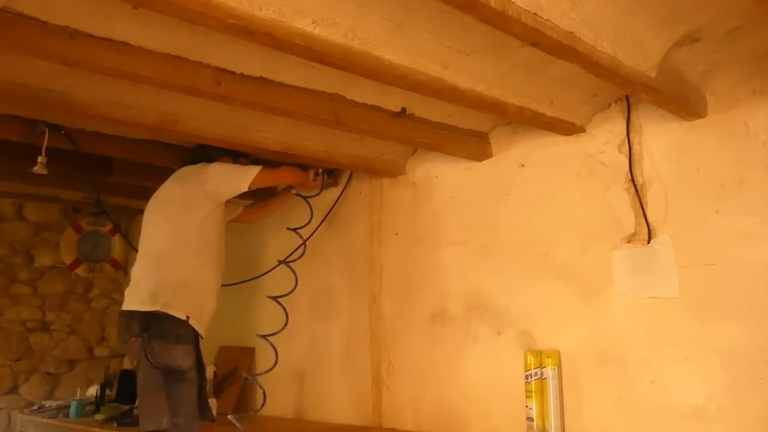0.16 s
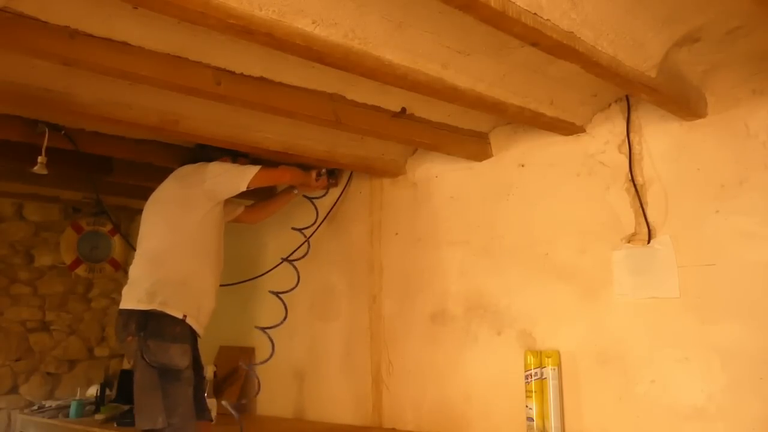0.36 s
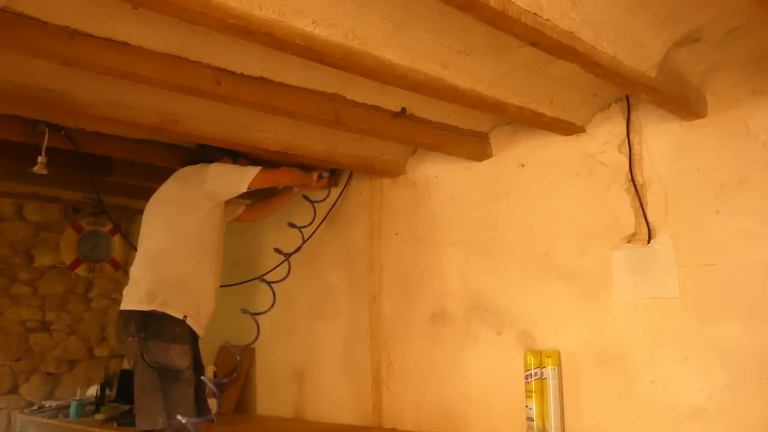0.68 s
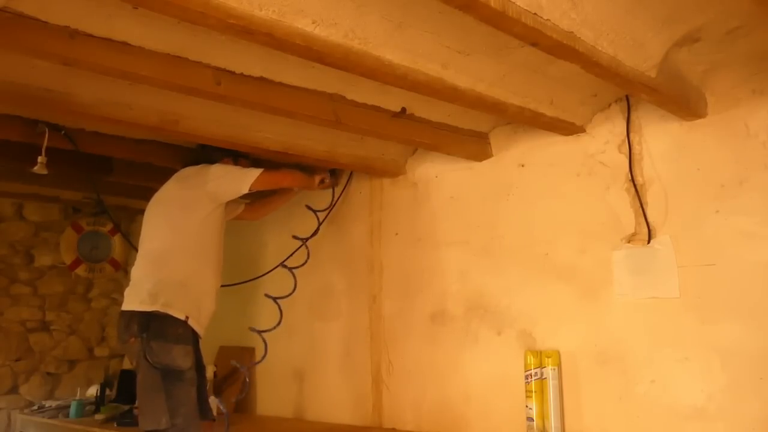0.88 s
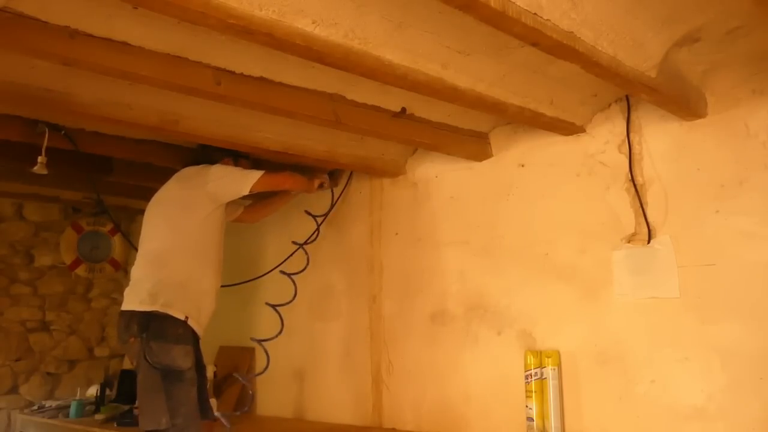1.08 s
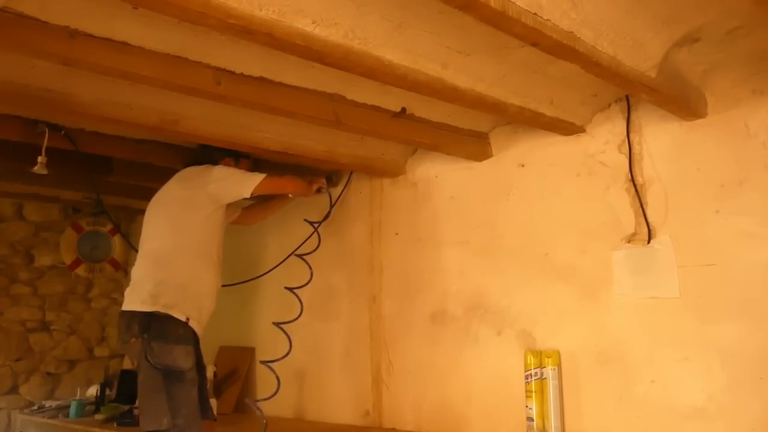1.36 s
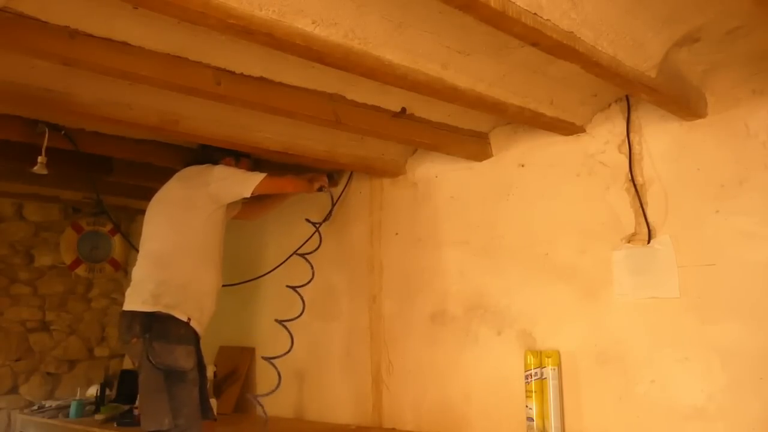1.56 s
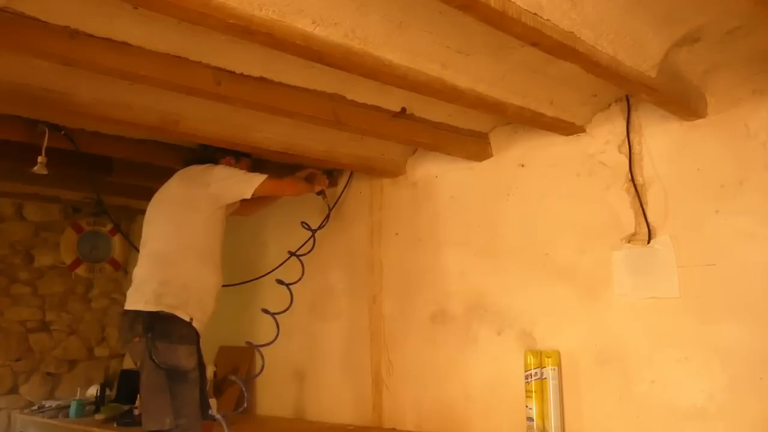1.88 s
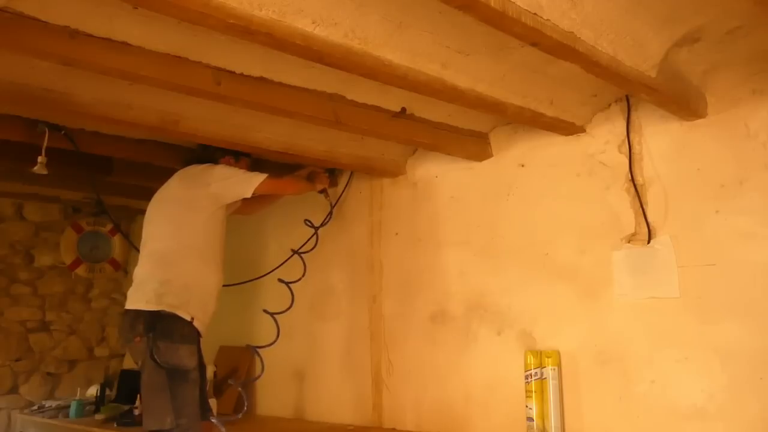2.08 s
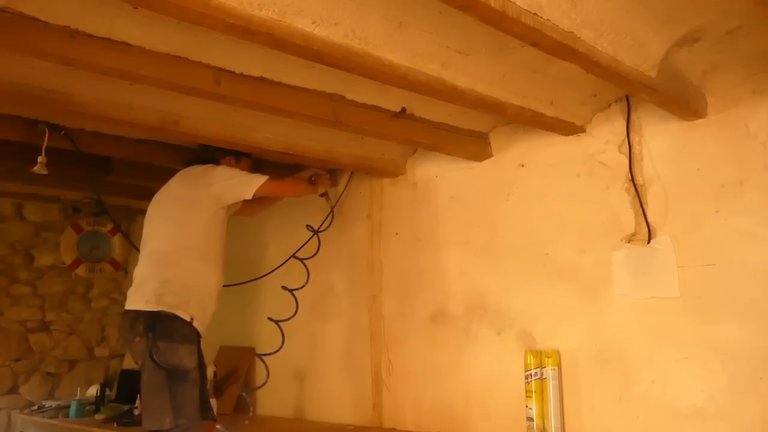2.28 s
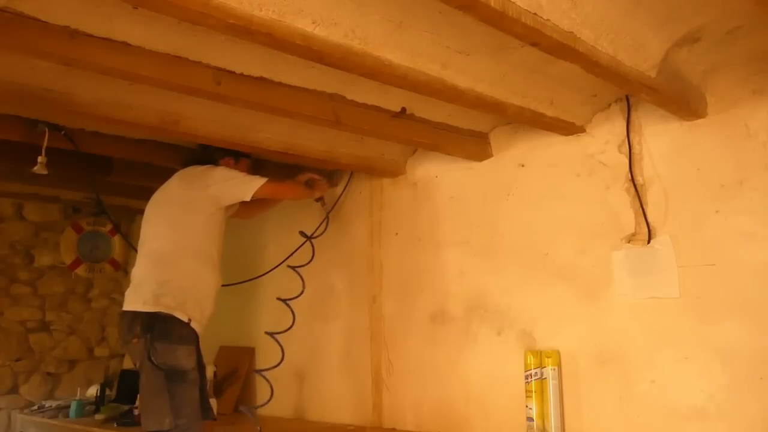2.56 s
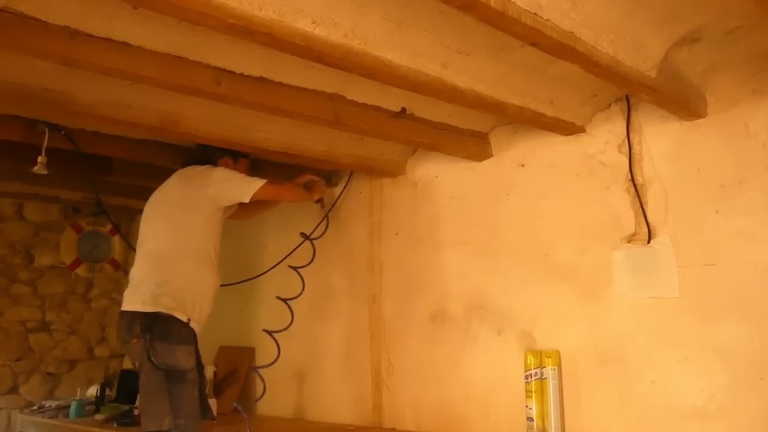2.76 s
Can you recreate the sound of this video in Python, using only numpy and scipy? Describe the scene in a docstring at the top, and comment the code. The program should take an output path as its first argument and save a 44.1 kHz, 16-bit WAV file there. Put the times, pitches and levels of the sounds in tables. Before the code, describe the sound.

An air hammer chisels a stone wall in a rapid, harsh burst, stops while chips knock and grit patters down, then fires a shorter burst and a few last chips fall; bare reverberant room, loud slightly overloaded microphone.

```python
"""Air hammer on a plastered stone wall

An air hammer chisels the wall in two short bursts, in a bare room with a beamed ceiling.
Each stroke excites resonators: an exhaust pop, a thud of wall and beams, the ringing steel chisel.
Noise shaped by the strokes gives the crunch of stone and the hiss of air past the valve.
Mostly between bursts, chips drop: each a damped knock with scattered noise, amid random ticks of grit.
Echo, faint room noise and a hum surround this; gain control and overload shape the sum."""
import sys
import numpy as np
from scipy import signal
from scipy.fft import rfft, irfft
from scipy.io import wavfile
from scipy.ndimage import uniform_filter1d

SR = 44100
rng = np.random.default_rng(int(sys.argv[2]) if len(sys.argv) > 2 else 0)


def generate_wav(signal):
    """Clip the signal to [-1, 1] and save it as 16-bit WAV at the path in sys.argv[1]."""
    frames = np.transpose(np.atleast_2d(signal))
    scaled = np.clip(frames, -1, 1) * 32767
    pcm = np.round(scaled).astype(np.int16)
    wavfile.write(sys.argv[1], SR, pcm)


N = 130095

# Hammer bursts, one list each: [t/s, stroke rate/Hz, pop level/dB, blow level/dB, hiss level/dB]
BURSTS = [
    [(.2285, 43.7, -4, -10.5, -17), (.26, 43.6, -13.5, -18, -20.5), (.4, 42.0, -13, -18, -24.5),
     (.5, 40.9, -14.5, -18, -24), (.78, 41.3, -14, -15.5, -24), (.86, 42.3, -12.5, -21.5, -22.5),
     (.94, 41.0, -15.5, -13.5, -23.5), (.98, 33.3, -13, -21, -28.5), (1.012, 37, -23.5, -47, -40)],
    [(1.982, 42.0, -10, -13, -23), (2.02, 43.8, -12.5, -14.5, -20.5), (2.1, 43.3, -11.5, -20.5, -24.5),
     (2.22, 43.0, -15.5, -16.5, -26), (2.34, 42.0, -12, -20.5, -23), (2.445, 40.1, -17.5, -16, -25.5),
     (2.46, 29, -10, -15, -28), (2.49, 32.0, -25, -16.5, -54), (2.535, 36.7, -17.5, -58, -48)],
]
# Piston stirring as the valve opens: [t/s, pop level/dB]
VALVE_OPENING = [(0.208, -51), (1.957, -36.5)]
# Resonances of wall and beams: [f/Hz, level/dB, T60/s]
WALL_MODES = [(166.5, -44, 0.039), (219.7, -19, .12), (262.4, -19, 0.051), (294.6, -7.5, 0.12),
              (330.5, -7.5, 0.084), (387, -14, 0.12), (473, -15.5, 0.16), (590, -23, 0.033)]
# Frequencies of the chisel's steel modes: [f/Hz]
CHISEL_HZ = [1310, 2130, 4800, 9300, 8450, 9200, 9290, 12900, 14800, 15490]
# Strength and decay of those modes, in the same order: [level/dB, T60/s]
CHISEL_DECAYS = [(-18, 0.061), (-17, 0.036), (-18, 0.048), (0, 0.0055), (-8, 0.033), (-17, 0.025),
                 (-7, 0.054), (-16, 0.046), (-22, 0.064), (-19, 0.061)]
# Spectrum of the escaping air, also used for the crunch: [f/Hz, relative level/dB]
AIR_SPECTRUM = [(290, -38), (500, 3), (530, -6), (773, -4.5), (1050, -15.5), (1320, -7.5), (2360, -12),
                (5310, -14.5), (9220, -10), (14000, -17.5), (16000, -9.5)]
# Chips landing: [t/s, level/dB, ring f/Hz, treble level/dB, scatter decay/s, scatter level/dB,
# echo send level/dB]; treble and scatter are relative to the chip, the send to its direct sound
CHIPS = [(0.1716, -42, 2220, -22, .01, -10, 0), (1.1352, -17.5, 2820, -13, 0.0084, -11, 1),
         (1.1646, -14.5, 2530, -29, .012, -4.5, -2.5), (1.27, -30.5, 2100, -10, .012, -10, -4),
         (1.3289, -30, 3200, -17, 0.0085, -12, -1.5), (1.3648, 4, 2130, -51, 0.0098, -14.5, -2.5),
         (1.472, -14.5, 2090, -15, 0.012, -4, -3), (1.548, -12.5, 2770, -20.5, 0.012, -8, -2),
         (1.6572, -23.5, 1690, -34, 0.0075, -6.5, -1.5), (1.714, -32, 2080, -25, 0.0072, -8.5, 0.5),
         (1.747, -32.5, 2120, -21, 0.0088, -9, -1), (1.803, -35, 2220, -21.5, 0.011, -7.5, -1.5),
         (1.852, -35.5, 1320, -27.5, 0.0068, -16, -1), (1.8665, -37.5, 1040, -22, 0.0072, -4, -13),
         (1.9048, -38, 1250, -12.5, 0.0092, -2.5, -6), (2.6271, -12.5, 2430, -26, .015, -5.5, -1.5),
         (2.8167, -29, 1620, -25, 0.018, -8, 1.5), (2.8386, -29, 1780, -24, 0.0081, -9.5, -3),
         (2.918, -29, 1950, -26, 0.014, -3, -5)]
# Modes of a chip: [multiple of its ring frequency/1, level/dB]
CHIP_MODES = [(.4, -11), (.65, -4.5), (1, -2), (1.3, -1.5), (1.65, -5)]
# Spectrum of stone scatter: [f/Hz, relative level/dB]
STONE_SPECTRUM = [(150, -61), (250, -17.5), (696, -5), (850, -11), (933, -7.5), (1670, -6.5), (1990, 4),
                  (2370, -7.5), (3430, -14), (6000, -5.5), (7800, -47), (13200, -120)]
# Fine grit: [t/s, level/dB]
GRIT_LEVELS = [(1.0, -70), (1.15, -56.5), (1.5, -53), (1.7, -69.5), (1.95, -57), (2.55, -60), (2.7, -47),
               (2.95, -61)]
# Reverberation of the room: [f/Hz, T60/s]
ROOM_T60 = [(100, 0.36), (300, 0.67), (1000, 0.36), (3000, 0.31), (8000, .3), (16000, 0.12)]
# Spectrum of the room noise: [f/Hz, relative level/dB]
FLOOR_SPECTRUM = [(18, -32), (30, 13), (112, -22.5), (170, -22), (499, -20), (540, -23), (889, -26.5),
                  (11700, -43.5), (14800, -39), (16000, -72)]

VALVE_LEAD_S, VALVE_RISE_DB = .024, 37.5  # air rushes in before the first stroke
JITTER_S, STROKE_SPREAD_DB = .0005, 2.5  # standard deviations; pops take half the level spread
POP_HZ, POP_T60_S = 285, .021
BLOW_LAG_S = .002  # blow after pop
MODE_SPREAD_DB = 3.0  # standard deviation of each steel mode, from blow to blow
CRUNCH_DB, CRUNCH_DECAY_S = 4.5, .0017  # stone breaking under the tip
HISS_GATE = .78  # depth to which the hiss puffs with each stroke

CHIP_RING_DB, CHIP_RING_T60_S, CHIP_TOP_HZ = .5, .0075, 4640
RATTLES_PER_S, RATTLE_DECAY_S = 600, .0015  # small contacts within the scatter
GRIT_PER_S, SNAP_DB = 430, -9  # snap: treble noise in the grit

ROOM_DB, ROOM_GAP_S, POP_ROOM_DB = 1, .003, -7.5
TURN_HZ = 3.0  # rate at which the sound turns between two echoes, evening out their colour
WIDTH_DB = -32.5
FLOOR_DB, HUM_HZ, HUM_DB = -48, 542.5, -64

BASS_CUT_HZ, CUTOFF_HZ, FULL_SCALE = 109, 16350, .85
GAIN_KNEE_DB, GAIN_SHARE = -20, .23  # dB of reduction per dB above the knee
GAIN_ATTACK_S, GAIN_RELEASE_DB_PER_S = .018, 81  # release of the held level


def amp(db):
    """Decibel law: a level becomes an amplitude ratio."""
    return 10 ** (np.asarray(db) / 20)


def rms_one(x):
    """Normalisation of power: the effective value becomes one."""
    return x / np.sqrt(np.mean(x ** 2) + 1e-20)


def at_hz(points, hz):
    """Logarithmic pitch scale: table values are interpolated over log frequency."""
    table = np.array(points)
    return np.interp(np.log(np.maximum(hz, 1)), np.log(table[:, 0]), table[:, 1])


def colour(x, spectrum):
    """Linear filtering: a spectrum weights the sound, falling away below its lowest point."""
    hz = np.arange(len(x) // 2 + 1) * SR / len(x)
    low_edge = 1 / (1 + (spectrum[0][0] / np.maximum(hz, 1)) ** 4)
    return irfft(rfft(x) * amp(at_hz(spectrum, hz)) * low_edge, len(x))


def ring(clicks, hz, t60):
    """Damped resonance: each unit click starts a decaying sine of initial height one."""
    radius, angle = amp(-60 / (t60 * SR)), 2 * np.pi * hz / SR
    feedback = [1, -2 * radius * np.cos(angle), radius * radius]
    return signal.lfilter([0, np.sin(angle)], feedback, clicks + 1e-18)


def fade(clicks, seconds):
    """Exponential relaxation: each click becomes an envelope with this time constant."""
    return signal.lfilter([1], [1, -np.exp(-1 / (seconds * SR))], clicks + 1e-18)


def strokes():
    """Phase accumulation: the integral of the running rate times the pops, blows and hiss puffs."""
    t = np.arange(N) / SR
    pops, blows, hiss_level = np.zeros((3, N))
    for rows in BURSTS:
        s, rate, pop_db, blow_db, hiss_db = np.transpose(rows)
        on = (t >= s[0]) & (t <= s[-1])
        turns = np.cumsum(np.interp(t, s, rate) * on) / SR
        count = int(turns[-1]) + 1
        luck = rng.standard_normal((count, 3))
        luck[0] = 0  # the first stroke is exact
        when = np.interp(np.arange(count), turns[on], t[on]) + JITTER_S * luck[:, 0]
        at = (when * SR).astype(int)
        pops[at] = amp(np.interp(when, s, pop_db) + .5 * STROKE_SPREAD_DB * luck[:, 1])
        blow_at = at + int(BLOW_LAG_S * SR)
        blows[blow_at] = amp(np.interp(when, s, blow_db) + STROKE_SPREAD_DB * luck[:, 2])
        rise_db = -VALVE_RISE_DB * np.clip((s[0] - t) / VALVE_LEAD_S, 0, 1)
        puffs = 1 + HISS_GATE * np.cos(2 * np.pi * (turns - .1))
        flowing = (t > s[0] - VALVE_LEAD_S) & (t <= s[-1])
        hiss_level += amp(np.interp(t, s, hiss_db) + rise_db) * puffs * flowing
    for s, db in VALVE_OPENING:
        pops[int(s * SR)] = amp(db)
    return pops, blows, hiss_level


def exhaust_and_wall(pops):
    """Forced resonance: a short pressure pulse excites the exhaust pop and the modes of wall and beams."""
    pulses = signal.lfilter(-np.hanning(60) / 30, 1, pops)
    sound = amp(3.0) * ring(pulses, POP_HZ, POP_T60_S)
    for hz, db, t60 in WALL_MODES:
        # each mode's excitation varies in steps of 512 samples
        variation_db = 1.8 * np.repeat(rng.standard_normal(N // 512 + 1), 512)[:N]
        sound = sound + amp(db) * ring(pulses * amp(variation_db), hz, t60)
    return sound


def chisel(blows):
    """Modal superposition: each blow sets the steel modes ringing with random strength and sign."""
    steel = np.zeros(N)
    for hz, (db, t60) in zip(CHISEL_HZ, CHISEL_DECAYS):
        strength = amp(MODE_SPREAD_DB * rng.standard_normal(N)) * rng.choice([-1, 1], N)
        steel += amp(db) * ring(blows * strength, hz, t60)
    return steel


def crunch(blows):
    """Fracture noise: each blow releases a short, exponentially dying noise burst."""
    noise = rms_one(colour(rng.standard_normal(N), AIR_SPECTRUM))
    return amp(CRUNCH_DB) * fade(blows, CRUNCH_DECAY_S) * noise


def air_hiss(hiss_level):
    """Turbulence noise: coloured noise is amplitude-modulated by the puffing flow."""
    return hiss_level * rms_one(colour(rng.standard_normal(N), AIR_SPECTRUM))


def hammer():
    """Common excitation: one stroke sequence drives the pop and thud, and the steel, crunch and hiss."""
    pops, blows, hiss_level = strokes()
    return exhaust_and_wall(pops), chisel(blows) + crunch(blows) + air_hiss(hiss_level)


def band_noise(low_hz, high_hz, noise):
    """Band limitation: a second-order Butterworth design passes one range of frequencies."""
    sos = signal.butter(2, [low_hz, high_hz], "band", fs=SR, output="sos")
    return signal.sosfilt(sos, noise)


def grit(body, bright):
    """Poisson process: random ticks of uneven height gate the noise of stone and its treble snap."""
    s, db = np.transpose(GRIT_LEVELS)
    ticks = (rng.random(N) < GRIT_PER_S / SR) * amp(2.78 * rng.exponential(1, N))
    noise = rms_one(fade(ticks, .0023) * (body + amp(SNAP_DB) * bright))
    return amp(np.interp(np.arange(N) / SR, s, db, left=-120)) * noise


def chips():
    """Impact and scatter: a knock rings damped modes, and small contacts roughen a dying noise."""
    body = rms_one(colour(rng.standard_normal(N), STONE_SPECTRUM))
    bright = rms_one(band_noise(4500, 10500, rng.standard_normal(N)))
    contacts = (rng.random(N) < RATTLES_PER_S / SR) * rng.exponential(1, N)
    rattle = rms_one(.84 + fade(contacts, RATTLE_DECAY_S))
    rough = rattle * body
    low, high = np.zeros((2, 2, N + SR))  # rows of each: heard directly, sent round the room
    span = np.arange(4000)
    for s, db, hz, treble_db, scatter_s, scatter_db, echo_db in CHIPS:
        at = int(s * SR) + span
        decay = amp(db) * np.exp(-span / (scatter_s * SR))
        knock = amp(db + CHIP_RING_DB) * (span == 0)
        rings = np.zeros(len(span))
        for k, (ratio, mode_db) in enumerate(CHIP_MODES):
            rings += (-1) ** k * amp(mode_db) * ring(knock, ratio * hz, CHIP_RING_T60_S)
        onset = 1 - np.exp(-span / 40)
        scatter = amp(scatter_db) * decay * onset * rough[at % N]
        direct_and_sent = amp([[0], [echo_db]])
        low[:, at] += direct_and_sent * (scatter + rings)
        high[:, at] += direct_and_sent * amp(treble_db) * decay * bright[at % N]
    dull = signal.butter(10, CHIP_TOP_HZ, fs=SR, output="sos")
    return signal.sosfilt(dull, low[:, :N]) + high[:, :N] + grit(body, bright)


def room(x):
    """Diffuse reverberation: half-octave noise bands decay at their own rates in two unrelated tails."""
    t = np.arange(SR // 2) / SR
    edges = 60 * 2 ** np.arange(0, 8.6, .5)
    white = rng.standard_normal((2, 2, len(t)))
    tail = np.zeros((2, len(t)))
    for k, (low, high) in enumerate(zip(edges, edges[1:])):
        t60 = at_hz(ROOM_T60, np.sqrt(low * high))
        tail += band_noise(low, high, white[k % 2]) * amp(-60 * t / t60)
    tail *= np.clip(t / ROOM_GAP_S - .5, 0, 1)  # silence, then a ramp
    tail /= np.sqrt(np.sum(tail ** 2, axis=1, keepdims=True))
    return signal.fftconvolve(x[None], tail, axes=1)[:, :N]


def background():
    """Stationary noise: a faint coloured floor and a distant hum, a resonator driven by noise."""
    floor = amp(FLOOR_DB) * rms_one(colour(rng.standard_normal(N), FLOOR_SPECTRUM))
    hum = amp(HUM_DB) * rms_one(ring(rng.standard_normal(N), HUM_HZ, .37))
    return floor + hum


def scene():
    """Superposition: all sounds add; a faint noise, opposite in the two channels, widens the nearly mono sound."""
    pop, rest = hammer()
    fallen, fallen_sent = chips()
    sent = rest + fallen_sent
    turn = 2 * np.pi * TURN_HZ * np.arange(N) / SR
    # the sound turns between two unrelated echoes; the pop feeds only the first
    first_tails = room(sent * np.cos(turn) + amp(POP_ROOM_DB) * pop)
    second_tails = room(sent * np.sin(turn))
    echo, widening = amp(ROOM_DB) * (first_tails + second_tails)
    centre = pop + rest + fallen + echo + background()
    return centre + amp(WIDTH_DB) * widening * np.array([[1], [-1]])


def record(dry):
    """Dynamic compression: after a bass cut, gain falls late on loud sound; then clipping and top cut."""
    bass_cut = signal.butter(2, BASS_CUT_HZ, "high", fs=SR, output="sos")
    x = signal.sosfilt(bass_cut, dry)
    power = uniform_filter1d(np.mean(x ** 2, axis=0), size=128)
    level_db = 10 * np.log10(power + 1e-12)
    # peaks of the level are held, sinking at the release rate
    ramp = GAIN_RELEASE_DB_PER_S * np.arange(N) / SR
    held_db = np.maximum.accumulate(level_db + ramp) - ramp
    over_db = np.maximum(held_db - GAIN_KNEE_DB, 0)
    keep = np.exp(-1 / (GAIN_ATTACK_S * SR))
    late_over_db = signal.lfilter([1 - keep], [1, -keep], over_db)
    x = x * amp(-GAIN_SHARE * late_over_db)
    overloaded = np.clip(x, -FULL_SCALE, FULL_SCALE)
    top_cut = signal.cheby2(22, 70, CUTOFF_HZ, fs=SR, output="sos")
    return signal.sosfilt(top_cut, overloaded)


dry = scene()
out = record(dry)
generate_wav(out)
```